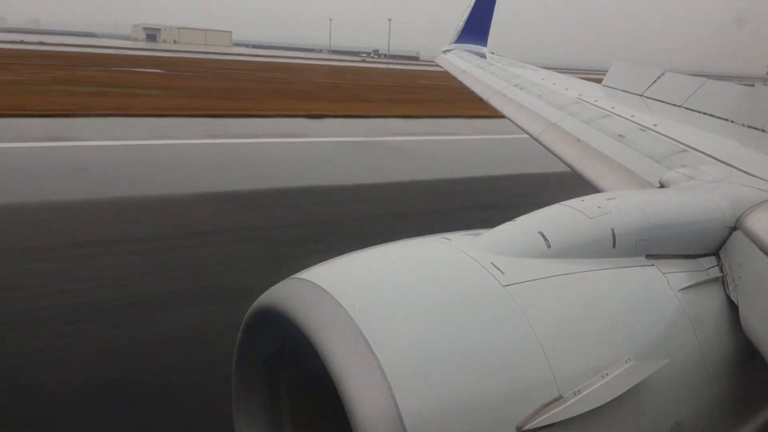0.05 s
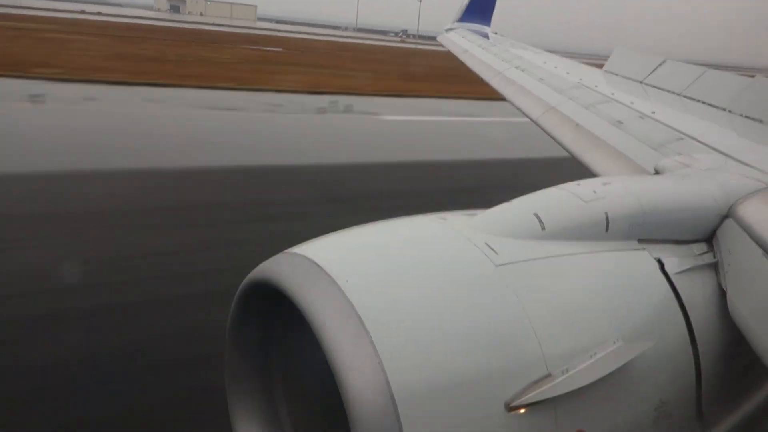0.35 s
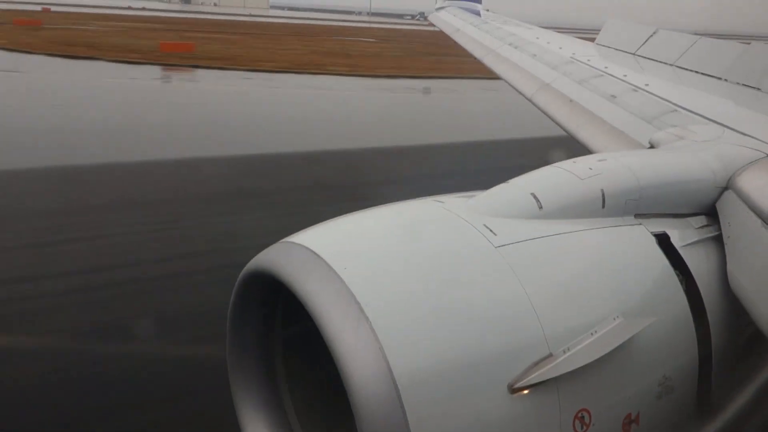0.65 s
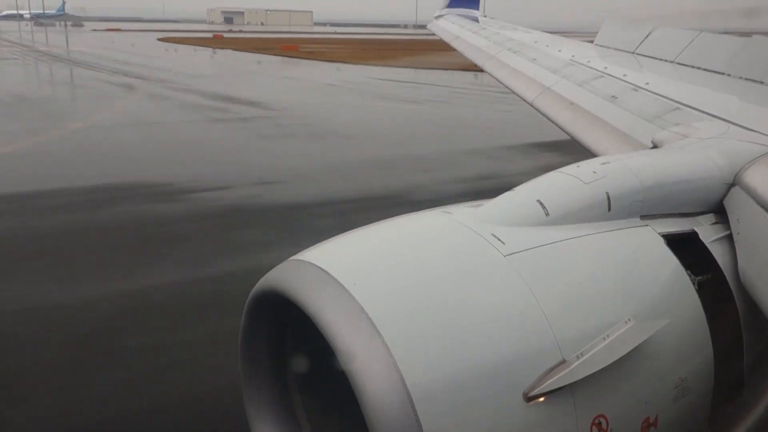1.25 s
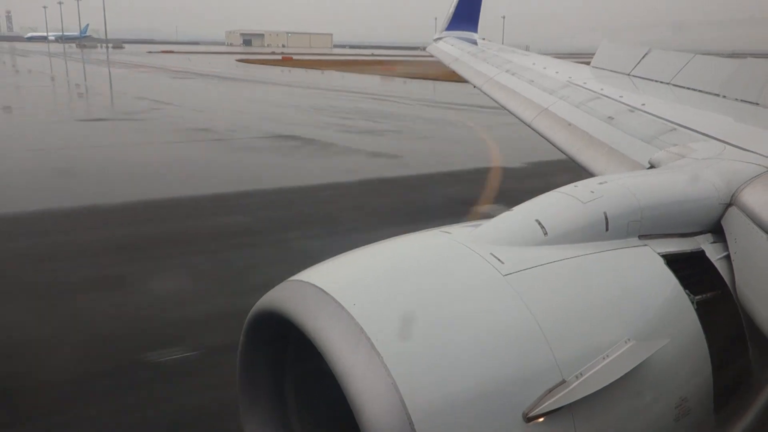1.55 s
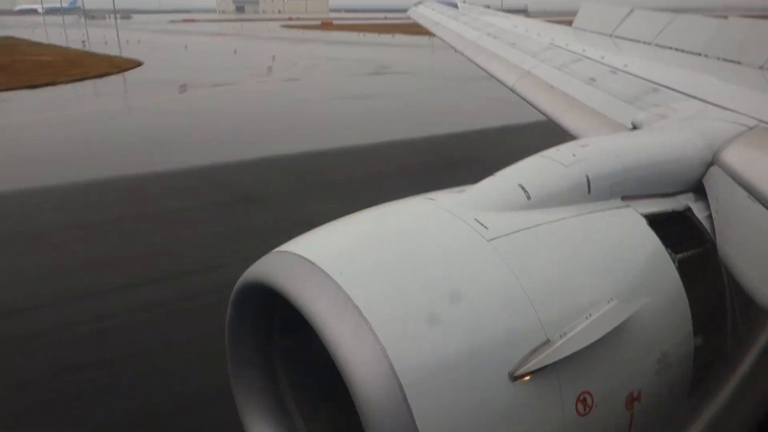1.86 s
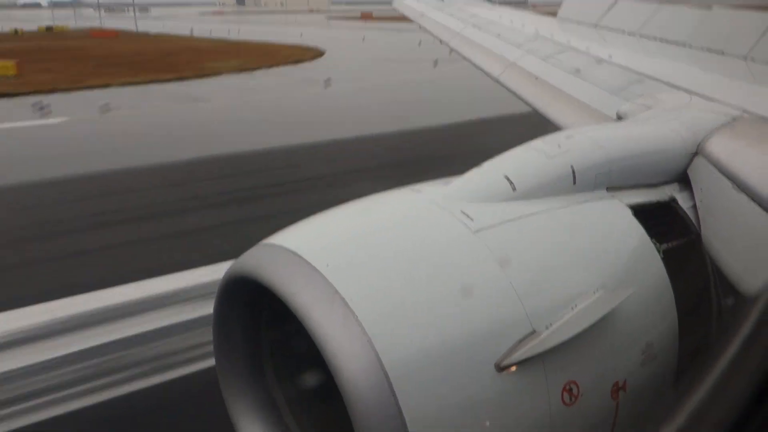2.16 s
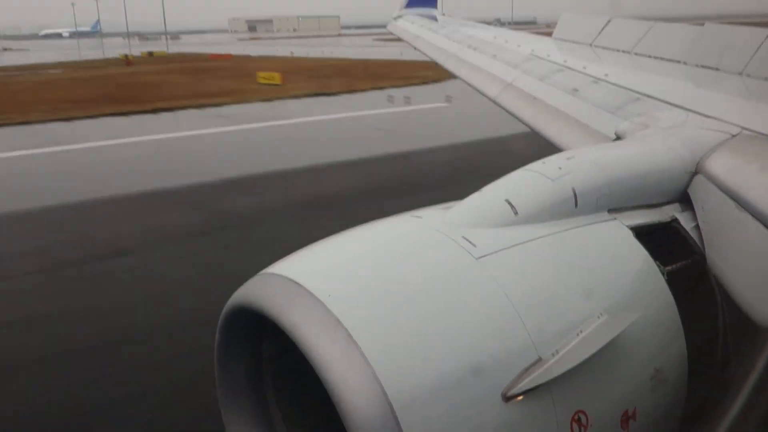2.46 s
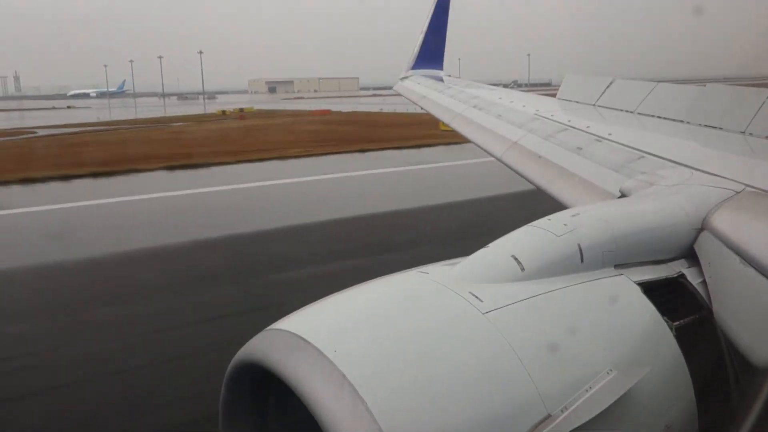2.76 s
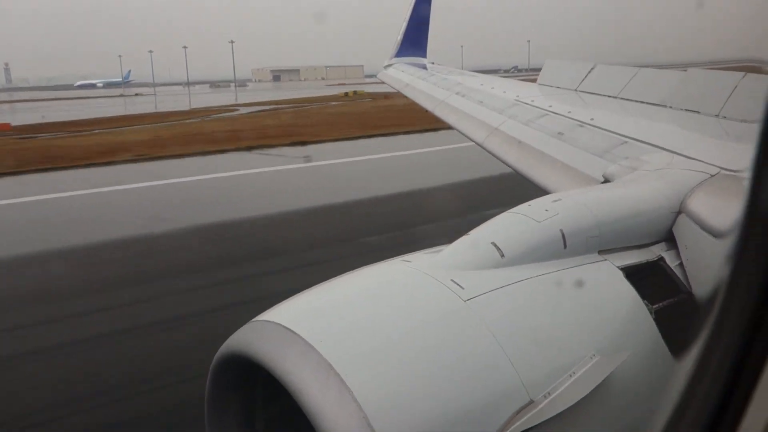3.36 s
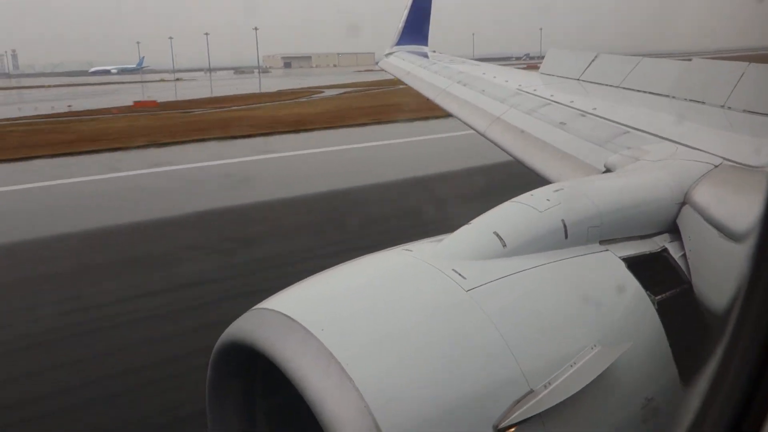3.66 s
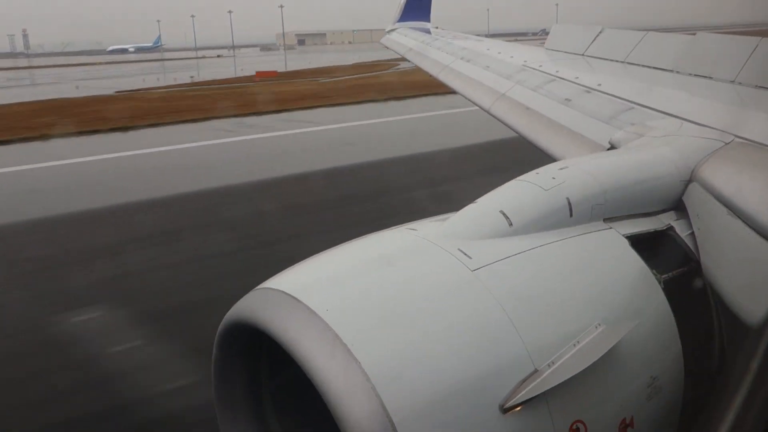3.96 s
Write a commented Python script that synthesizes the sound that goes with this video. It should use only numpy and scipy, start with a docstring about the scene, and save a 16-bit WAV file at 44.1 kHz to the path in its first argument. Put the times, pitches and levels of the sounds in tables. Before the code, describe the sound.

A deep jet engine roar builds inside a landing airliner's cabin over rumbling wheels.

```python
"""First you hear engines humming and wheels rumbling through the floor of an airliner braking on a runway.
The hum climbs in pitch and sinks into the growing roar of reverse thrust (exhaust turned forward to brake).
Air hisses outside and loose plastic fittings rattle. Near the middle a cabin panel clacks, and a faint
compressor whistle and a thin fan whine come through the wall. A limiter holds the loudest peaks down."""
import sys
import numpy as np
from scipy.fft import rfft, irfft, next_fast_len
from scipy.io import wavfile
from scipy.ndimage import uniform_filter1d, minimum_filter1d, map_coordinates

SR = 44100
rng = np.random.default_rng(int(sys.argv[2]) if len(sys.argv) > 2 else 0)


def master(y):
    """Save y as 16-bit WAV."""
    cut = np.clip(np.atleast_2d(y).T, -1, 1)
    pcm = np.round(cut * 32767)  # scale
    wavfile.write(sys.argv[1], SR, pcm.astype(np.int16))


N = 176400  # 4 seconds

# The engine hum. Each row: time in seconds, pitch in Hz, level in dB.
HUM_PATH = [(0, 179.4, -16), (.25, 178.2, -11), (.55, 180.1, -15.5), (.8, 182.2, -18.5),
            (1.2, 185.9, -21.5), (1.6, 192, -20), (2, 196.8, -18), (2.5, 209.1, -19), (3, 214.9, -22.5),
            (3.5, 221.2, -23.5), (4, 224, -30.5)]
# Reverse thrust. Each row: time in seconds, level in dB (0 is full thrust).
THRUST_LEVEL = [(0, -5.5), (.45, -8), (.9, -5), (1.4, -3.5), (1.8, -1), (2.4, -2), (3, -1.03), (3.5, 0),
                (4, -0.5)]
# How three noises swell and fade. Each row: time in seconds, level in dB.
WHEEL_LEVEL = [(0, -36), (.2, -23), (.6, -28), (1, -22), (1.42, -25.5), (1.6, -26), (2.3, -24.5),
               (3, -25.5), (3.5, -29.5), (4, -26.5)]
SLEEVE_LEVEL = [(0, -68.5), (.5, -63), (.8, -54.5), (1.35, -53), (1.6, -55), (1.9, -48), (2.35, -53.5),
                (2.7, -56.5), (4, -62.5)]  # air through the reverser's sliding cover
HISS_LEVEL = [(0, -21.5), (.8, -14.5), (1.5, -5), (2, -7), (2.75, -1), (3.1, 2.5), (3.6, 4), (4, 2.5)]  # the reverser's hiss, added to HISS_DB

# A colour is a noise's mix of low and high. Each row: frequency in Hz, relative strength in dB.
ROAR_COLOUR = [(25, -26), (60, -10.5), (100, -5.5), (135, -6), (175, -3), (215, 0.5), (260, -7), (340, -8),
               (400, -17), (500, -23.5), (700, -32.5), (1200, -47), (3000, -79.5)]
WHEEL_COLOUR = [(15, -18), (28, -13), (40, -15), (48, -5.5), (55, 2.5), (62, -5.5), (72, -16), (100, -18.5),
                (200, -36), (600, -75)]
SKIN_AIR_COLOUR = [(100, -6), (400, 0), (700, 0), (830, -4), (1050, -2.5), (1600, -9), (2400, -14),
                   (3050, -22.5), (3900, -21), (4800, -20.5), (5800, -23.5), (8000, -30), (11500, -32.5),
                   (15500, -37.5)]
SLEEVE_AIR_COLOUR = [(600, -12.5), (1300, -2.5), (1900, -4.5), (2330, -2.5), (2420, 6.5), (2560, -0.5),
                     (2900, -10), (5000, -21), (10000, -35)]
HISS_COLOUR = [(500, -6), (1200, 4.5), (2000, -2.5), (2900, -1.5), (3300, -0.5), (4100, -1), (4700, -16.5),
               (5800, -9.5), (7000, -14.5), (8500, -19), (15000, -41.5)]
RATTLE_COLOUR = [(500, -23), (2000, 5), (4000, -2), (6000, 1), (8500, -4), (11000, -4), (15500, -15.5)]
CREAK_COLOUR = [(3000, -26), (7000, -9), (10000, -2.5), (12500, -0.5), (15500, -11)]
PANEL_CRACK_COLOUR = [(300, -6), (1300, 6.5), (3000, -6.5), (6000, -10), (10000, -20), (15500, -34.5)]

# Ticks of loose fittings. Each row: start in seconds, level in dB, fade time (to fall 60 dB) in seconds.
FITTING_TICKS = [(.109, -36.5, .03), (.295, -44, 0.084), (.41, -46, .08), (.583, -33.5, .04),
                 (.605, -36.5, .05), (.902, -41, 0.028), (.961, -41, .02), (1.132, -38, .02),
                 (1.45, -41, 0.056), (1.464, -35.5, .09), (1.498, -36.5, .02), (1.57, -29.5, 0.029),
                 (1.642, -39.5, 0.028), (1.731, -32.5, 0.039), (1.8, -30.5, 0.039), (2.025, -30.5, .01),
                 (2.468, -41, .04), (2.503, -37, .03), (2.536, -35.5, .05), (2.623, -36, 0.069),
                 (2.664, -41, .04), (2.911, -35.5, 0.046), (3.045, -33.5, .03), (3.078, -36, .05),
                 (3.1, -42, 0.055), (3.368, -33, .04), (3.885, -42, 0.058)]
# The compressor's whistle. Each row: time in seconds, pitch in Hz, level in dB.
WHISTLE_PATH = [(1.6, 5250, -91), (1.85, 5500, -65), (2.3, 6090, -60.5), (2.6, 6450, -61),
                (2.75, 6750, -69), (2.95, 7200, -65), (3.2, 7080, -57), (3.5, 6750, -71), (4, 6500, -69)]
# Panel hits. Each row: start in seconds, level in dB, brightness in dB per octave, fade time in seconds.
PANEL_CLACKS = [(1.7468, -24, -1.5, .022), (2.1346, -28, 2.5, 0.028), (2.1373, -28.5, 2.5, .02),
                (2.143, -35.5, 3.5, 0.15)]
# The notes the panel rings with. Each row: pitch in Hz, relative level in dB, fade time in seconds.
PANEL_NOTES = [(1326, -1.5, .05), (1750, -6, .04), (2310, -8, .04), (2470, -14.5, .05), (3670, -4.5, .035),
               (4420, -7, .04), (5500, -13, .05), (6200, -5.5, 0.05), (8401, -17.5, 0.036)]
# Low swells in the roar. Each row: peak time in seconds, half length in seconds, pitch in Hz, level in dB.
LOW_SWELLS = [(1.781, 0.081, 119.3, -23.5), (2.52, 0.049, 289.2, -25.5), (2.84, 0.049, 165, -23.5),
              (3.137, .07, 290, -24), (3.374, .06, 311.9, -20.5), (3.64, 0.1, 140, -18),
              (3.78, 0.045, 174, -17.5), (3.92, .08, 315.8, -20), (3.9, 0.08, 125.3, -22)]
# Flares of the fan whine. Each row: peak time in seconds, half length in seconds, level in dB.
FAN_FLARES = [(1.877, .1, -54), (2.17, .12, -53.5), (2.444, .08, -53), (2.73, .015, -51),
              (2.858, .014, -48), (3.274, 0.015, -47.5), (3.364, .018, -49), (3.41, 0.022, -52),
              (3.5, 0.017, -49), (3.601, .22, -53.5)]

# How alike left and right are. Each row: frequency in Hz, likeness from 0 (unrelated) to 1 (the same).
STEREO_LIKENESS = [(30, .98), (60, .995), (250, .99), (500, .96), (1100, .93), (1500, .78), (3800, .68),
                   (4700, .4), (6000, .42), (7500, .08), (14000, 0)]
# Which side is louder. Each row: frequency in Hz, left minus right in dB.
STEREO_BALANCE = [(100, -0.7), (200, 1.17), (380, 2), (700, 3.5), (1150, 6), (2200, 1.9), (4400, 1.5),
                  (8000, 1.3), (15000, -3)]
# Which side is earlier. Each row: frequency in Hz, the left's lead in radians (negative means later).
STEREO_LEAD = [(20, -.25), (65, -.33), (110, -.47), (190, -.7), (300, -.92), (600, -1.08), (1300, -.95),
               (2700, -.7), (4000, -.25), (7000, -.5)]

FAR_ENGINE_HZ, FAR_ENGINE_DB = 9, -8  # offsets from the near engine; the level is for full thrust
ROAR_DB, SKIN_AIR_DB, HISS_DB = -14, -39, -46
CONTACT_RISE_S = 0.00076
RING_DB, SNAP_DB, SNAP_HZ, SNAP_FADE_S = -11.5, 11.5, 1700, 0.0015  # levels compared with the crack
SWELL_FALL_OCTAVES_PER_S = 2.5
WHINE_HZ, WHINE_WANDER_HZ = 2010, 23
LIMIT_DB, LIMIT_HOLD_S, TOP_HZ = -7.5, 0.011, 15750


def amp(db):
    """Turn a level in dB into a number to multiply by."""
    return 10 ** (np.asarray(db) / 20)


def unit(x):
    """Scale a signal so its average strength (rms) is 1."""
    return x / np.sqrt(np.mean(x ** 2) + 1e-20)


def along(points, hz):
    """Read a table between its rows, on a logarithmic frequency scale."""
    freqs, values = np.transpose(points)
    return np.interp(np.log(hz + 1), np.log(freqs + 1), values)


def curves(rows):
    """Turn each column after the time into one value per sample."""
    times, *columns = np.transpose(rows)
    return [np.interp(np.arange(N) / SR, times, column) for column in columns]


def wobble(rate):
    """A smooth curve through `rate` random values a second."""
    return map_coordinates(rng.standard_normal(2048), [np.arange(N) * rate / SR], mode="wrap")


def filtered(x, response):
    """Multiply each frequency in x by response(hz)."""
    size = next_fast_len(N + SR // 4)
    return irfft(rfft(x, size) * response(np.fft.rfftfreq(size, 1 / SR)), size)[..., :N]


def tone(hz):
    """A pure tone of strength 1 that follows a moving pitch."""
    return np.sqrt(2) * np.sin(2 * np.pi * np.cumsum(hz) / SR)


def narrow_noise(hz, width_hz):
    """A fuzzy tone: a narrow band of noise around a moving pitch."""
    fuzz = wobble(width_hz) + 1j * wobble(width_hz)
    return unit(np.real(fuzz * np.exp(2j * np.pi * np.cumsum(hz) / SR)))


def rush(colour):
    """Stereo noise of strength 1; left and right are alike in the bass and differ in the treble."""
    def response(hz):
        spread = np.arccos(np.clip(along(STEREO_LIKENESS, hz), -1, 1)) / 2
        return amp(along(colour, hz)) * [np.cos(spread), np.sin(spread)]
    mid, side = filtered(rng.standard_normal((2, N)), response)
    return unit(np.array([mid + side, mid - side]))


def scatter(per_second, db, spread_db, fade_s):
    """Rows for small contacts at random times and levels."""
    draws = rng.random((round(per_second * N / SR), 2)) * [N / SR, 1]
    return [(start, db + spread_db * (force - .5), fade_s) for start, force in draws]


def bursts(rows):
    """The loudness curve of short contacts: each rises fast, then dies away."""
    power, t = np.zeros(N + SR), np.arange(SR // 8) / SR
    rise = 1 - np.exp(-t / CONTACT_RISE_S)
    for start, db, fade_s in rows:
        power[round(start * SR):][:len(t)] += (amp(db - 60 * t / fade_s) * rise) ** 2
    return np.sqrt(power[:N])


def engine_hum(thrust_db):
    """Two engines speed up slightly apart; their tones waver more as the thrust grows."""
    hz, db = curves(HUM_PATH)
    waver_hz = 4 * amp(2 * thrust_db)
    level = amp(db + 0.52 * wobble(12))
    near = tone(hz + waver_hz * wobble(14))
    far = tone(hz + FAR_ENGINE_HZ + waver_hz * wobble(14))
    return level * (near + amp(FAR_ENGINE_DB + 1.3 * thrust_db) * far)


def exhaust_roar(thrust_db):
    """Churning reversed exhaust booms through the body of the plane."""
    return amp(ROAR_DB + thrust_db + wobble(12)) * rush(ROAR_COLOUR)


def wheel_rumble():
    """The rolling wheels shake the floor."""
    db, = curves(WHEEL_LEVEL)
    return amp(db) * rush(WHEEL_COLOUR)


def airflow(thrust_db):
    """Air rushes over the plane's skin, pours through the opening sleeve and hisses from the reverser."""
    sleeve_db, = curves(SLEEVE_LEVEL)
    swell_db, = curves(HISS_LEVEL)
    skin_db = SKIN_AIR_DB + 0.11 * (thrust_db - thrust_db.mean())
    skin = amp(skin_db + 0.95 * wobble(20)) * rush(SKIN_AIR_COLOUR)
    sleeve = amp(sleeve_db + 1.3 * wobble(18)) * rush(SLEEVE_AIR_COLOUR)
    hiss = amp(HISS_DB + swell_db + .9 * wobble(8.9)) * rush(HISS_COLOUR)
    shared_flutter = amp(.8 * wobble(16))  # all three waver in loudness together
    return shared_flutter * (skin + sleeve + hiss)


def rattles():
    """Loose plastic fittings tick over a faint chatter and the fine creaking of the trim."""
    chatter = scatter(per_second=60, db=-49, spread_db=14, fade_s=.02)
    grainy_noise = unit(amp(2 * wobble(900)) * rush(RATTLE_COLOUR))
    creaks = scatter(per_second=22, db=-43, spread_db=11.5, fade_s=.008)
    return bursts(FITTING_TICKS + chatter) * grainy_noise + bursts(creaks) * rush(CREAK_COLOUR)


def compressor_whistle():
    """A faint, fuzzy tone climbs as the engine speeds up, then drops a little."""
    hz, db = curves(WHISTLE_PATH)
    return amp(db + wobble(12)) * np.array([narrow_noise(hz, width_hz=550) for _ in range(2)])


def panel_clacks():
    """A cabin panel snaps against its frame, gives a noisy crack and rings briefly."""
    out, t = np.zeros((2, N)), np.arange(SR // 6) / SR
    crack_noise = rush(PANEL_CRACK_COLOUR)
    snap = amp(SNAP_DB - 60 * t / SNAP_FADE_S) * np.cos(2 * np.pi * SNAP_HZ * t)
    for start, db, brightness, fade_s in PANEL_CLACKS:
        clack = bursts([(start, db, fade_s)]) * crack_noise
        ring = sum(amp(note_db + rng.normal(0, 1.8, (2, 1)) - 60 * t / ring_s) * np.sin(2 * np.pi * hz * t)
                   for hz, note_db, ring_s in PANEL_NOTES)
        clack[:, round(start * SR):][:, :len(t)] += amp(db) * (amp(RING_DB) * ring + snap)
        out += filtered(clack, lambda hz: amp(brightness * np.log2((np.minimum(hz, 6000) + 300) / 3000)))
    return out


def low_swells():
    """Brief low swells in the roar, each sliding down in pitch."""
    t, out = np.arange(N) / SR, np.zeros(N)
    for peak_s, half_s, hz, db in LOW_SWELLS:
        pitch = hz * 2 ** (-SWELL_FALL_OCTAVES_PER_S * np.clip(t - peak_s, -.5, .5))
        swell = amp(db) * np.exp(-((t - peak_s) / half_s) ** 2 / 2)
        out += swell * narrow_noise(pitch, width_hz=55)
    return out


def fan_whine():
    """The fan's thin whine comes and goes, wandering slightly in pitch."""
    t = np.arange(N) / SR
    whine = tone(WHINE_HZ + WHINE_WANDER_HZ * wobble(70))
    flares = sum(amp(db) * np.exp(-((t - peak_s) / half_s) ** 2 / 2) for peak_s, half_s, db in FAN_FLARES)
    return flares * amp(2.5 * wobble(40)) * whine


def scene():
    """All the sounds add up beside the window and reach left and right a little differently."""
    thrust_db, = curves(THRUST_LEVEL)
    cabin = engine_hum(thrust_db) + exhaust_roar(thrust_db) + wheel_rumble() + airflow(thrust_db)
    cabin += rattles() + compressor_whistle() + panel_clacks() + low_swells() + fan_whine()
    share = np.array([[.5], [-.5]])  # each side takes half, in opposite directions
    balance = lambda hz: amp(share * along(STEREO_BALANCE, hz))
    timing = lambda hz: np.exp(1j * share * along(STEREO_LEAD, hz))
    return filtered(cabin, lambda hz: balance(hz) * timing(hz))


def record(dry):
    """A fast limiter turns loud peaks down, then the highest treble is cut off."""
    hold = round(LIMIT_HOLD_S * SR)
    needed_gain = np.minimum(1, amp(LIMIT_DB) / (np.abs(dry).max(axis=0) + 1e-9))
    smooth_gain = uniform_filter1d(minimum_filter1d(needed_gain, hold), hold)
    return filtered(dry * smooth_gain, lambda hz: hz < TOP_HZ)


dry = scene()
out = record(dry)
master(out)
```